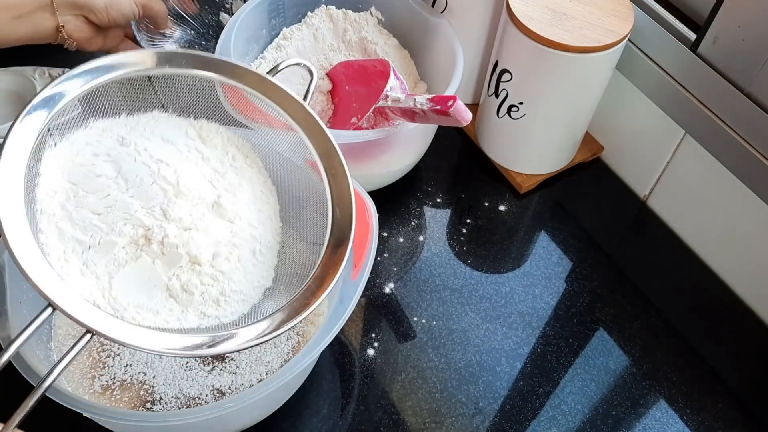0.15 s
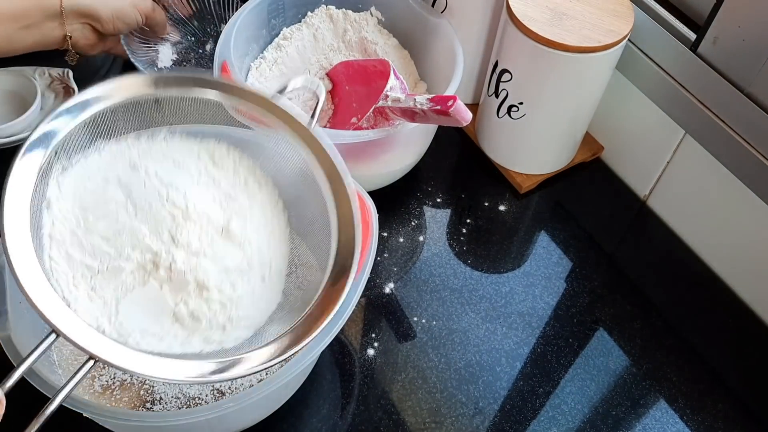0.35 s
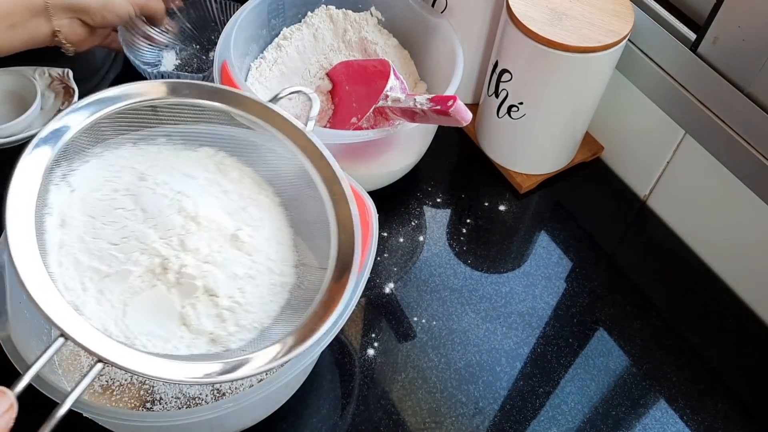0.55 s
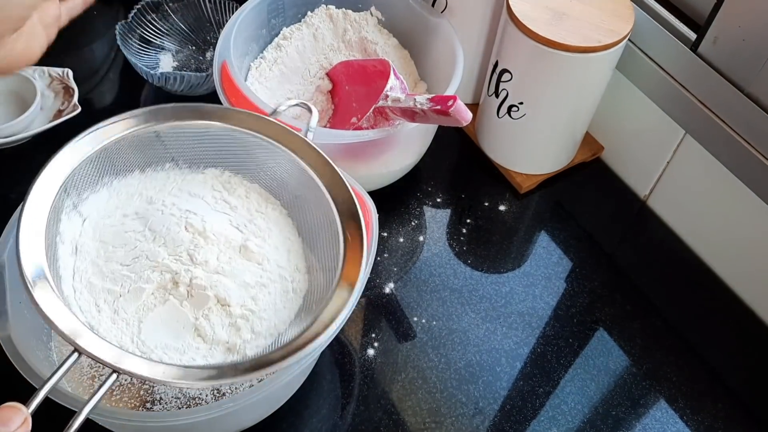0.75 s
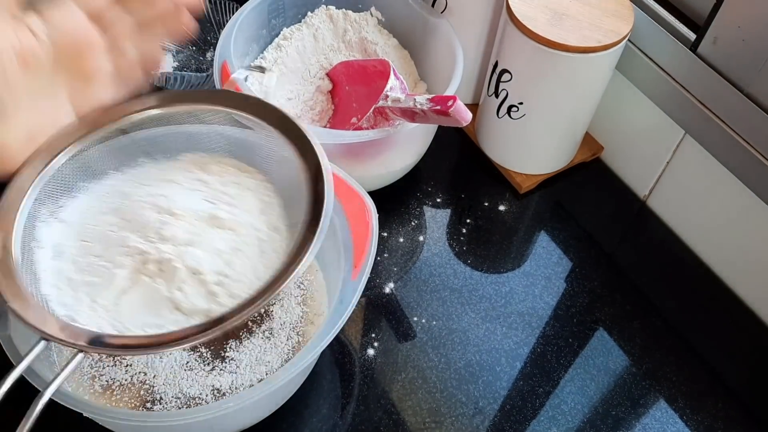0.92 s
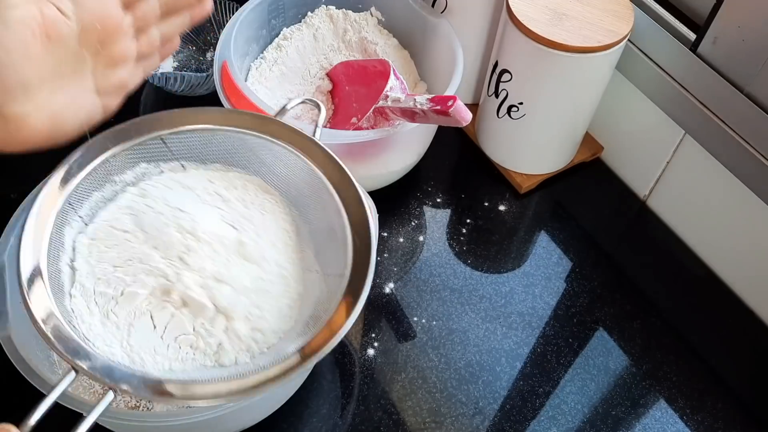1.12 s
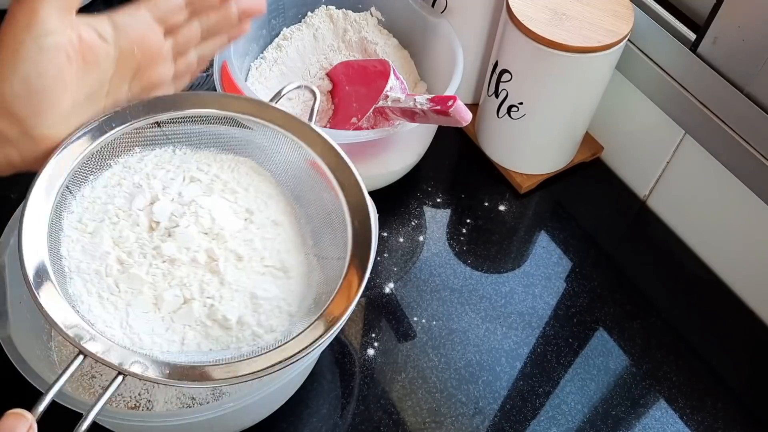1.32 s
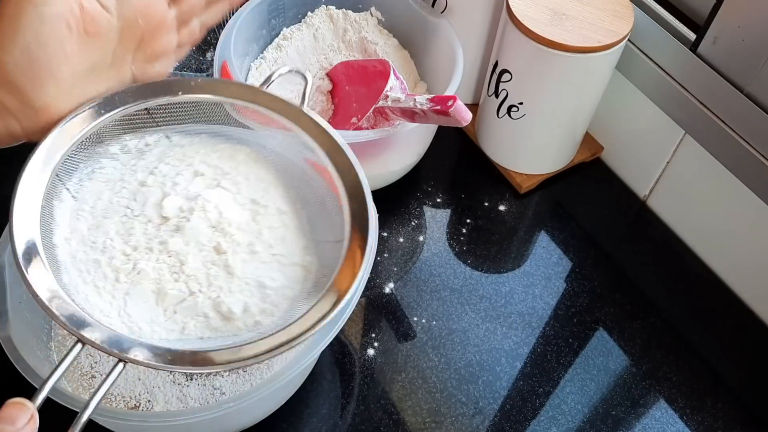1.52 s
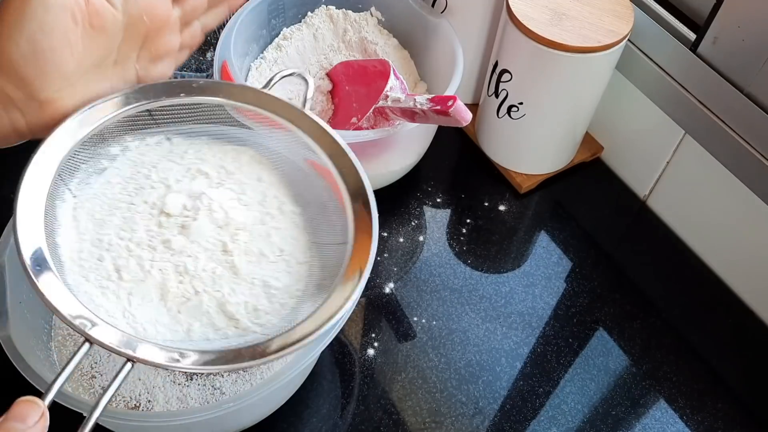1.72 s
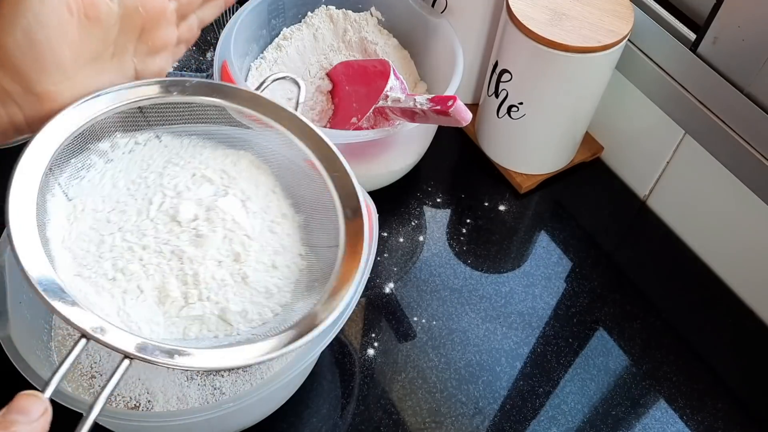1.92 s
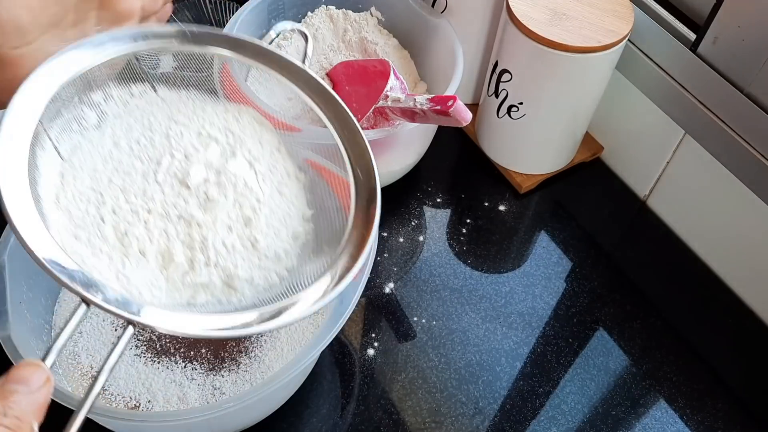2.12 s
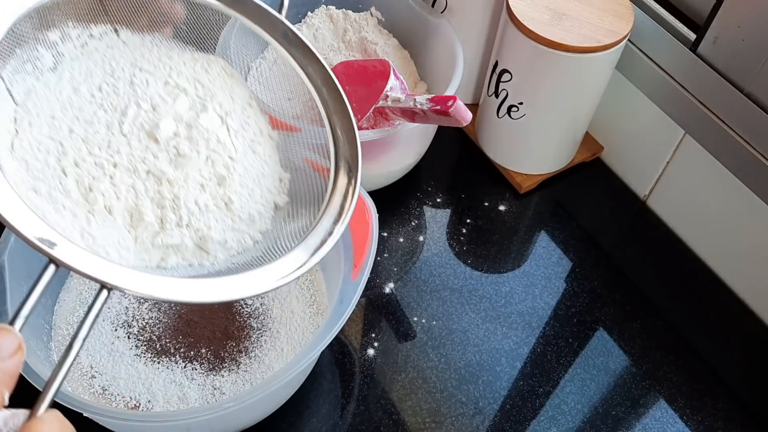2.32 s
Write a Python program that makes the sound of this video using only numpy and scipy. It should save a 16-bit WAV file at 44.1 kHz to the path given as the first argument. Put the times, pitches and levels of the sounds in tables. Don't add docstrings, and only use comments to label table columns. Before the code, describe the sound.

A small glass bowl lands on a stone counter, bouncing ever faster into a rattle, in a kitchen

```python
import sys
import numpy as np
from scipy import signal
from scipy.io import wavfile

SR = 44100
rng = np.random.default_rng(int(sys.argv[2]) if len(sys.argv) > 2 else 0)


def to_wav(s):
    ch = np.atleast_2d(s).T
    pcm = np.round(np.clip(ch, -1, 1) * 32767)
    wavfile.write(sys.argv[1], SR, pcm.astype(np.int16))


def gain_from_db(level_db):
    decades = np.asarray(level_db, float) / 20
    return 10 ** decades


N = 103635


def rms_one(x):
    return x / np.sqrt(np.mean(x ** 2) + 1e-20)


def at_hz(points, hz):
    points_hz, values = np.transpose(points)
    return np.interp(np.log(hz), np.log(points_hz), values)


def drift(rate_hz):
    r = np.exp(-80 * np.pi * rate_hz / SR)
    slow = signal.lfilter([1], [1, -2 * r, r * r], rng.standard_normal(N // 40 + 2002))[2000:]
    return np.interp(np.arange(N) / 40, np.arange(len(slow)), rms_one(slow))


def clicks(start_s, gain):
    out = np.full(N, 1e-18)
    np.add.at(out, (np.asarray(start_s) * SR).astype(int), gain)
    return out


def fade(x, tau_s):
    return signal.lfilter([1], [1, -np.exp(-1 / (tau_s * SR))], x)


def ring(x, hz, t60_s, rise_s):
    turn = np.exp(2j * np.pi * hz / SR)
    soft = np.exp(-1 / (rise_s * SR))
    swell = signal.lfilter([1 - soft], [1, -soft * turn], x)
    decay = gain_from_db(-60 / (max(t60_s, .002) * SR))
    return signal.lfilter([1], [1, -decay * turn], swell)


def band(x, low_hz, high_hz):
    sos = signal.butter(2, [low_hz, min(high_hz, .48 * SR)], "band", fs=SR, output="sos")
    return signal.sosfilt(sos, x)


def stereo_noise():
    return rng.standard_normal((2, N))


def pair(two, alike):
    alike = np.clip(alike, -1, 1)
    shared = np.sqrt(1 + alike) * two[0]
    return shared + np.sqrt(1 - alike) * two[1] * np.array([[1], [-1]])


def background():
    # frequency in Hz, density in dB per Hz.
    murmur_spectrum = [(25, -26), (50, -7.5), (100, 1.5), (200, -9), (400, -8.5), (800, -17.5), (1300, -28),
                       (6000, -38.5)]
    # frequency in Hz, left-right likeness from -1 to 1.
    ear_likeness = [(60, 1), (240, 0.22), (950, 0.42), (3770, -0.51), (15000, -0.02)]
    # appliance hum center in Hz, width in Hz, level in dB.
    appliance_bands = [(324, 45, -66.5), (495.8, 47, -74.5), (1700, 240, -79), (3600, 150, -86.5)]
    murmur_db, hiss_db = -58, -83.5
    murmur, hum = 0, 0
    edges_hz = 22 * 2 ** np.arange(0, 8.6, .5)
    white = rng.standard_normal((2, 2, N))
    for k, (low_hz, high_hz) in enumerate(zip(edges_hz, edges_hz[1:])):
        hz = np.sqrt(low_hz * high_hz)
        gain = gain_from_db(at_hz(murmur_spectrum, hz) + 1.5 * drift(4))
        murmur = murmur + gain * pair(band(white[k % 2], low_hz, high_hz), at_hz(ear_likeness, hz))
    for hz, width_hz, level_db in appliance_bands:
        noise = band(stereo_noise(), hz - width_hz / 2, hz + width_hz / 2)
        hum = hum + gain_from_db(level_db + 2.5 * drift(2.5)) * rms_one(pair(noise, at_hz(ear_likeness, hz)))
    hiss = gain_from_db(hiss_db) * band(stereo_noise(), 5800, 16000)
    return gain_from_db(murmur_db) * rms_one(murmur) + hum + hiss


def far_clatter():
    # time in seconds, level in dB.
    clatter_level = [
        (0, -69.5),
        (.22, -72),
        (.85, -65.5),
        (1.051, -79.5),
        (1.5, -96.5),
        (1.951, -86.5),
        (2.2, -75),
        (2.35, -90),
    ]
    s, level_db = np.transpose(clatter_level)
    return gain_from_db(np.interp(np.arange(N) / SR, s, level_db)) * rms_one(band(stereo_noise(), 1200, 4800))


def sleeve():
    # center in seconds, half length in seconds, level in dB.
    brushes = [
        (1.47, .05, -78),
        (2.17, .12, -77),
    ]
    t = np.arange(N) / SR
    stroke = sum(gain_from_db(level_db) * np.exp(-((t - at_s) / half_s) ** 2) for at_s, half_s, level_db in brushes)
    return stroke * rms_one(band(stereo_noise(), 4600, 5400))


def engine():
    # time in seconds, firings per second, level in dB.
    engine_course = [
        (0, 31.3, -61.5),
        (.4, 31.3, -51),
        (.9, 34, -62),
        (1.3, 31, -58.5),
        (1.7, 31.3, -56.5),
        (1.95, 31.8, -53),
        (2.2, 31.9, -48),
        (2.35, 31.9, -50.5),
    ]
    # multiple of the firing rate, level in dB.
    exhaust_harmonics = [(2, -18.5), (3, -2), (4, -10.5), (5, -6), (6, -7), (7, -11.5), (9, -11),
                         (10, -23.5), (11, -10)]
    s, rate_hz, level_db = np.transpose(engine_course)
    t = np.arange(N) / SR
    firing_hz = np.interp(t, s, rate_hz) * (1 + 0.0052 * drift(3.3))
    turn = 2 * np.pi * np.cumsum(firing_hz) / SR
    tone = 0
    for k, harmonic_db in exhaust_harmonics:
        gain = gain_from_db(harmonic_db + drift(3))
        tone = tone + gain * np.sin(round(k) * turn + .6 * k + .7 * drift(1.5))
    return gain_from_db(np.interp(t, s, level_db)) * tone * gain_from_db(np.array([[-.8], [.8]]))


def flour():
    # start in seconds, hiss level in dB.
    sieve_shakes = [(0.038, -69.5), (0.148, -74.5), (.9, -73), (1.01, -79.5), (1.105, -79.5), (1.22, -73.5),
                    (1.315, -84), (1.43, -78.5), (1.529, -76), (1.655, -74.5), (1.76, -77.5), (1.875, -75),
                    (1.92, -85), (2.01, -77.5), (2.09, -77.5)]
    # mesh resonance in Hz, width in Hz, level in dB.
    mesh_bands = [(7200, 1000, -5), (8350, 1000, 0), (11700, 1200, -3), (12900, 900, -4), (15400, 700, -1)]
    rise_s, fall_s = 0.018, 0.075
    s, level_db = np.transpose(sieve_shakes)
    puff = fade(fade(clicks(s, gain_from_db(level_db)), rise_s), fall_s) / (rise_s * SR)
    white, hiss = stereo_noise(), 0
    for hz, width_hz, mesh_db in mesh_bands:
        hiss = hiss + gain_from_db(mesh_db) * rms_one(band(white, hz - width_hz / 2, hz + width_hz / 2))
    return puff * gain_from_db(6) * rms_one(hiss)


def sieve_rim():
    # start in seconds, level in dB.
    rim_ticks = [
        (1.035, -70),
        (1.242, -56),
        (1.432, -65),
        (1.46, -63.5),
        (1.668, -48),
        (1.91, -55.5),
    ]
    s, level_db = np.transpose(rim_ticks)
    return fade(clicks(s, gain_from_db(level_db)), 0.0027) * band(stereo_noise(), 6500, 7900)


def kitchen(x):
    # frequency in Hz, t60 in seconds.
    room_decay = [(200, 0.52), (1000, 0.34), (3000, 0.25), (5000, 0.37), (8000, .3), (16000, 0.12)]
    room_db, likeness, start_s = -4.5, 0.28, 0.0028
    t = np.arange(SR) / SR
    white, tail = rng.standard_normal((2, 2, SR)), 0
    edges_hz = 100 * 2 ** np.arange(0, 7.6, .75)
    for k, (low_hz, high_hz) in enumerate(zip(edges_hz, edges_hz[1:])):
        t60_s = at_hz(room_decay, np.sqrt(low_hz * high_hz))
        tail = tail + band(white[k % 2], low_hz, high_hz) * gain_from_db(-60 * t / t60_s)
    tail = pair(tail * np.clip(t / start_s - 1, 0, 1), likeness)
    tail = gain_from_db(room_db) * tail / np.sqrt(np.sum(tail ** 2) / 2)
    return signal.fftconvolve(x[:1], tail)[:, :N]


def strike(s, touch_db, modes_hz, modes, spread_db, lag_s):
    # frequency in Hz, left minus right in dB.
    ear_balance = [(300, -4), (700, 8.5), (1400, 2), (2800, 1), (6300, -2), (10800, 1), (15000, 4)]
    luck = rng.standard_normal((len(s), len(modes), 2))
    phase = rng.uniform(0, 2 * np.pi, len(modes))
    side = np.array([[.5], [-.5]])
    out = 0
    for k, (hz, (level_db, t60_s)) in enumerate(zip(modes_hz, modes)):
        late_s = s + .0001 * np.abs(luck[:, k, 1])
        gain = gain_from_db(touch_db + level_db + spread_db * luck[:, k, 0])
        tone = ring(clicks(late_s, gain), hz, t60_s, rise_s=.0006)
        ears = np.exp(1j * (phase[k] - 2 * np.pi * hz * lag_s * side))
        out = out + np.imag(tone * ears) * gain_from_db(at_hz(ear_balance, hz) * side)
    return out


def crack(s, touch_db, bright_db):
    crack_db, crack_s = -30, .005
    hard = fade(clicks(s, gain_from_db(touch_db + (touch_db + 8) + crack_db)), crack_s)
    bright = fade(clicks(s, gain_from_db(touch_db + bright_db + crack_db + 17.5)), crack_s)
    middle = gain_from_db(12.5) * band(hard * stereo_noise(), 2400, 4730)
    high = band(bright * stereo_noise(), 5200, 8200)
    top = band(band(bright * stereo_noise(), 10200, 13600), 10200, 13600)
    return middle + high + top


def bowl():
    touch_s = [.247, .3112, .3437, .363, .3775, .3893, .3985, .406, .413, .42, .4265, .432, .495, .512,
               .519, .525, .547, .557, .565, .572, .581, .602, .615, .622, .628, .636, .646, .655, .666,
               .676]
    # peak in dB, brightness of the glass ring in dB.
    touch_levels = [(-1, -20), (-5.5, -13), (-5.5, -15.5), (-10, -17), (-10, -16), (-10.5, -16.5),
                    (-12.5, -15), (-13, -16.5), (-13.5, -15.5), (-15.5, -15), (-15.5, -15.5), (-17.5, -14),
                    (-22.5, -19), (-26, -27), (-22.5, -27), (-23, -26), (-20, -19.5), (-24.5, -20),
                    (-21.5, -20), (-21, -23), (-25.5, -23), (-20.5, -20), (-13, -12.5), (-12.5, -16),
                    (-12, -15), (-13.5, -11), (-11.5, -10), (-15, -9.5), (-12.5, -9), (-18, -8)]
    knock_hz = [300, 420, 600, 800, 1060, 1240, 1390, 1690, 1920, 2200, 2600, 3100, 4020, 4700]
    glass_hz = [5900, 6265, 6312, 7700, 9840, 10400, 10800, 11500, 12100, 12620, 13000, 13400, 15300, 15600]
    crockery_hz = [910, 2164, 3480]
    # level in dB, t60 in seconds.
    knock_modes = [(-21, .05), (-18, .025), (-15, .016), (-14, .014), (-4.5, .016), (-2, .013), (0, .015),
                   (-1, .012), (-1.5, .012), (-5, .011), (-6.5, .01), (-7, .009), (-19, .009), (-27, .008)]
    glass_modes = [(-17, .015), (-4, .035), (-14, .16), (-21, .008), (-26, .025), (-23, .02), (-11, .032),
                   (-17, .01), (-16, .012), (-11, .045), (-15, .02), (-14, .035), (-17, .015), (-6, .045)]
    crockery_modes = [(-45.5, 1.05), (-47, .45), (-48, .55)]
    knock_db, glass_db = -2.5, 5
    knock_lag_s, glass_lag_s = .00014, .00012
    s = np.array(touch_s)
    peak_db, bright_db = np.transpose(touch_levels)
    knock = strike(s, peak_db + knock_db, knock_hz, knock_modes, 1.2, knock_lag_s)
    glass = strike(s, peak_db + bright_db + glass_db, glass_hz, glass_modes, 1.8, glass_lag_s)
    crockery = strike(s, peak_db, crockery_hz, crockery_modes, 1.2, knock_lag_s)
    body = knock + glass + crockery + crack(s, peak_db, bright_db)
    return signal.sosfilt(signal.butter(4, 265, "high", fs=SR, output="sos"), body)


def scene():
    direct = bowl()
    sieve = flour() + sieve_rim()
    return background() + far_clatter() + sleeve() + engine() + sieve + kitchen(direct) + direct


def low_pass(x):
    return signal.sosfilt(signal.butter(12, 16410, fs=SR, output="sos"), x)


def record(dry):
    ceiling, cutoff_hz = 1.3, 16450
    rounded = ceiling * np.tanh(dry / ceiling)
    mix = signal.sosfilt(signal.cheby2(12, 70, cutoff_hz, fs=SR, output="sos"), rounded)
    return low_pass(mix)


dry = scene()
out = record(dry)
to_wav(out)
```